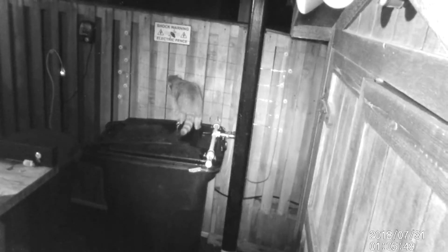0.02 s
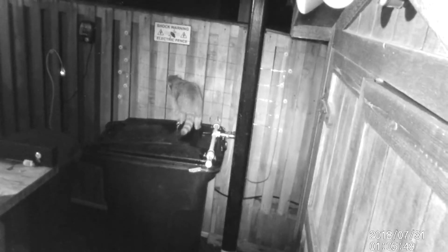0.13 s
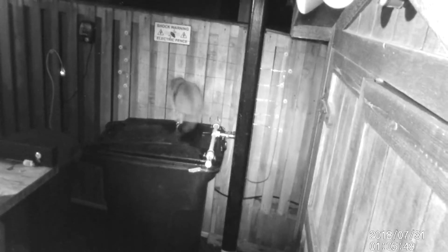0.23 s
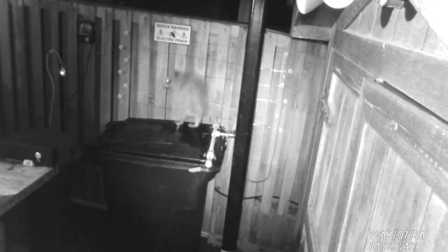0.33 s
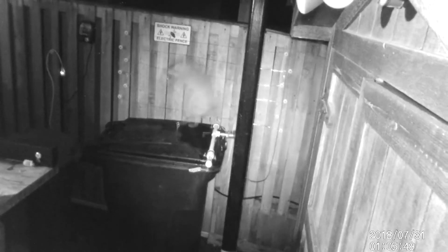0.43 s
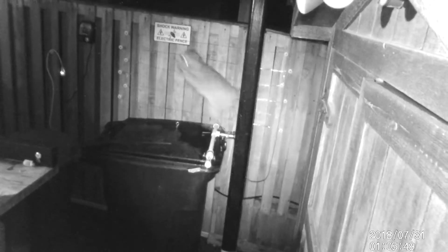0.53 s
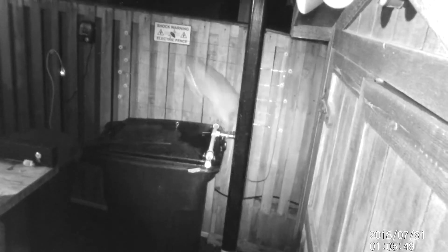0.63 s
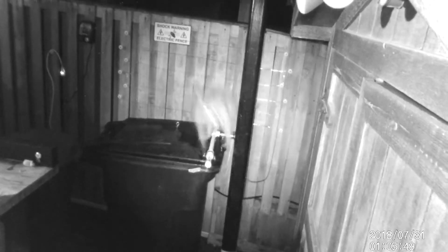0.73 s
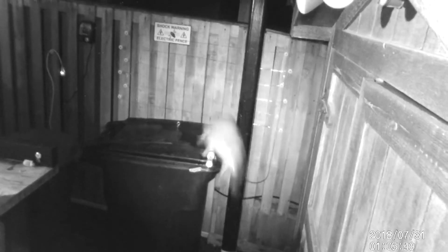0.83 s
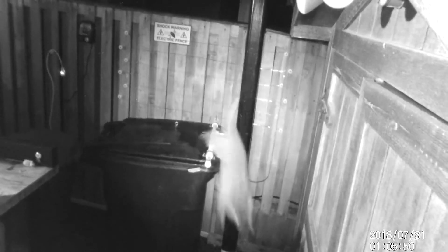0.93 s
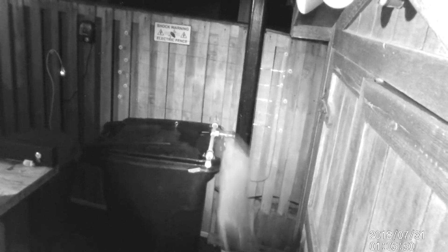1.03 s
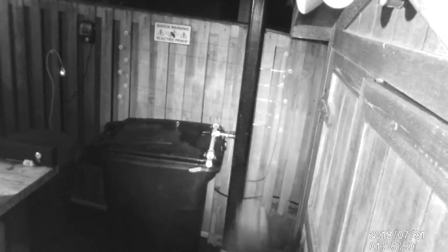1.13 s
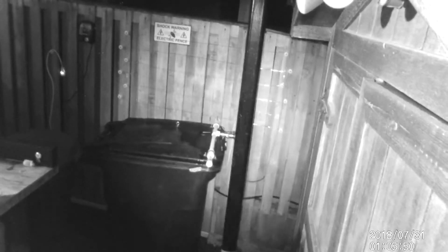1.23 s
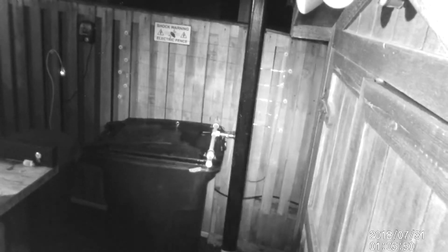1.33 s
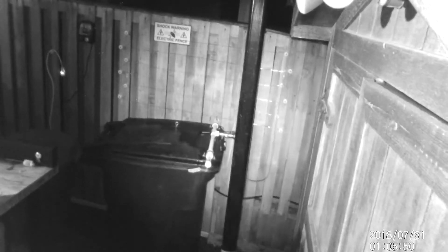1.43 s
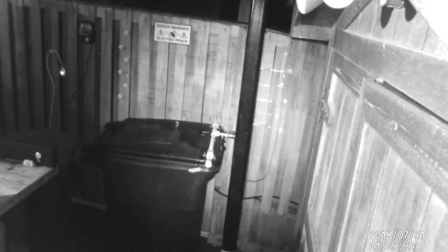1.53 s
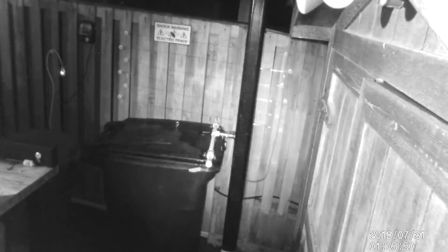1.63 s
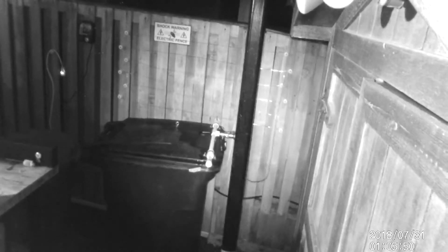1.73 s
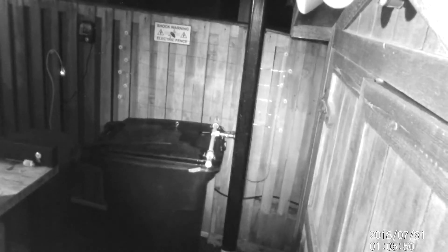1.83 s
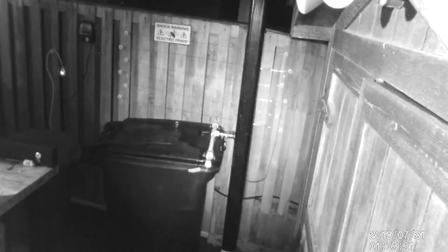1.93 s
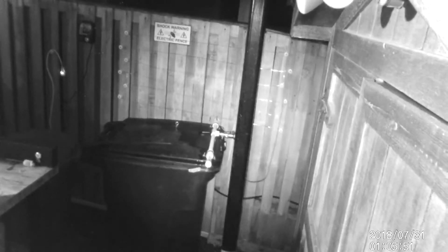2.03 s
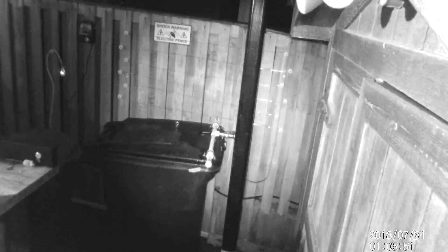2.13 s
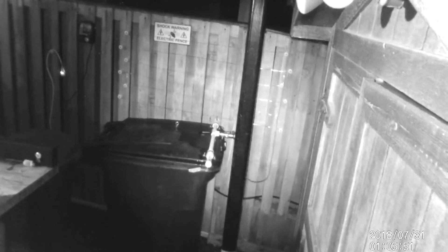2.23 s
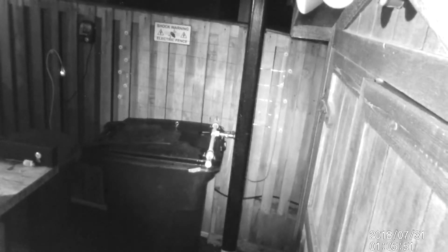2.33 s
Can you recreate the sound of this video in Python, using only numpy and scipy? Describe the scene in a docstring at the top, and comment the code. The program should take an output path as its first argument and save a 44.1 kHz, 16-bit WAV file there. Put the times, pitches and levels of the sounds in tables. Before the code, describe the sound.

An animal scrambles over a hollow bin lid, claws scratching, then crashes down and scurries off

```python
"""Night in a wooden shed: steady hiss and far insects throughout, heard on a camera microphone with a dull top.
First an animal scrambles across a bin lid: claws scratch in bursts of tiny clicks, paws and body thump. At
about 1.2 s it drops to the floor with a crash that clips, then runs off in ever fainter scratches. Clicks,
knocks and hiss are shaped noise, solid blows and claw ticks are short sine pulses; resonances ring as lid and
boards."""
import sys
import numpy as np
from scipy import signal
from scipy.fft import rfft, irfft
from scipy.io import wavfile
from scipy.ndimage import uniform_filter1d

SR = 44100
rng = np.random.default_rng(int(sys.argv[2]) if len(sys.argv) > 2 else 0)


def to_wav(sig):
    """Store sig (one row per channel, or 1-D mono) as 16-bit WAV at the path in sys.argv[1].

    Samples outside -1..1 are clipped; the rate is SR.
    """
    pcm = np.clip(np.atleast_2d(sig), -1, 1) * 32767
    pcm = np.round(pcm).astype(np.int16)
    wavfile.write(sys.argv[1], SR, pcm.T)  # frames by channels


N = 105840  # 2.4 s


def undb(db):
    """Turn decibels into an amplitude factor."""
    return 10 ** (np.asarray(db) / 20)


def unit(x):
    """Scale to rms 1."""
    return x / np.sqrt(np.mean(x ** 2) + 1e-18)


def band(x, hz, width_hz):
    """Two-pole resonance, gain 1 at the centre."""
    b, a = signal.iirpeak(hz, hz / width_hz, fs=SR)
    return signal.lfilter(b, a, x)


def double_band(x, hz, width_hz):
    """The same resonance twice in a row, for steeper skirts."""
    return band(band(x, hz, width_hz), hz, width_hz)


def grains(per_s, spread_db):
    """Random clicks of either sign, a few much larger than the rest."""
    hit = rng.random(N) < per_s / SR
    sign = rng.choice([-1., 1.], N)
    size = undb(spread_db * rng.exponential(size=N))
    return unit(hit * sign * size)


def envelope(start, hold, t60):
    """Quick rise, full level until hold seconds after the start, then exponential fall."""
    attack_s = 0.00033
    t = np.arange(N) / SR - start
    rise = np.clip(t / attack_s, 0, 1)
    return rise * undb(-60 * np.maximum(t - hold, 0) / t60)


# Colour of the steady hiss; its last level below 5 kHz or at it carries on above.
# Each row: frequency in Hz, relative level in dB per Hz.
HISS_COLOUR = [(18, -21), (30, 1.5), (170, -4), (290, -9.5), (528, -7), (588, -9.5), (983, -10.5),
               (5000, -19.5), (6500, -57), (11000, -120)]


def hiss():
    """Steady noise whose spectrum follows the colour table, read along a logarithmic frequency axis."""
    level_db = -46
    f = np.maximum(np.arange(N // 2 + 1) * SR / N, 1)
    hz, db = np.array(HISS_COLOUR).T
    db = np.where(hz > 5000, db[hz <= 5000][-1], db)
    colour = undb(np.interp(np.log(f), np.log(hz), db))
    return undb(level_db) * unit(irfft(rfft(rng.standard_normal(N)) * colour, N))


def insects():
    """Far-off trill: a narrow noise band throbs at a slightly wandering rate."""
    hz, width_hz, level_db = 5450, 650, -49
    throbs_per_s, depth = 60, 0.4
    wander = unit(uniform_filter1d(rng.standard_normal(N), size=4000))
    phase = np.cumsum(1 + 0.0965 * wander) * throbs_per_s / SR
    throb = 1 + depth * np.sin(2 * np.pi * phase)
    return undb(level_db) * throb * unit(double_band(rng.standard_normal(N), hz, width_hz))


def high_hiss():
    """A thin band of noise far above the trill."""
    hz, width_hz, level_db = 9400, 325, -56
    return undb(level_db) * unit(band(rng.standard_normal(N), hz, width_hz))


def shed(x):
    """Short diffuse tail of the plank walls: decaying noise that sets in after 4 ms."""
    t60_s, level_db, hz, width_hz = 0.4, -19.5, 650, 650 / 0.3
    t = np.arange(SR // 2) / SR
    tail = band(rng.standard_normal(len(t)), hz, width_hz) * undb(-60 * t / t60_s) * (t > 0.004)
    return signal.fftconvolve(x, tail / np.linalg.norm(tail))[:N] * undb(level_db)


# Resonances of the lid and boards, struck by paws and body.
# Each row: frequency in Hz, relative level in dB, ring setting in seconds (60 dB down in about half of it).
BODY_MODES = [(209.5, 28, 0.38), (302, -15.5, 0.6), (770, -8, 0.19), (930, 8, 0.047), (1220, -18.5, 0.26),
              (1846, 2, 0.21), (2099, -16, 0.19), (2229, -10, 0.34), (2396, 12, 0.12)]


def lid_and_boards(struck):
    """Whatever strikes them excites a row of resonances, set relative to the strength of the blows."""
    level_db = -13
    ring = sum(undb(db) * band(struck, hz, 4.6 / ring_s) for hz, db, ring_s in BODY_MODES)
    return undb(level_db) * unit(ring) * np.std(struck)


# Scuffles of paws and body on the hollow bin and boards.
# Each row: start in seconds, level in dB, centre in Hz, boom level in dB, hold in seconds,
# time to fall 60 dB in seconds.
SCUFFLES = [(0.078, -45, 256, -45, .05, 0.55), (0.191, -32.5, 299, -47, 0.066, 0.61),
            (0.243, -31.5, 420, -36.5, 0.041, 0.69), (0.332, -24, 450, -28, 0.035, 0.54),
            (0.365, -20, 252, -39, 0.012, 0.33), (0.441, -21.5, 556, -44, .02, 0.28),
            (0.461, -41.5, 750, -38.5, 0.0091, 1), (0.536, -30.5, 224, -45.5, .03, 0.2),
            (0.599, -28.5, 324, -35.5, 0.029, 0.49), (0.632, -35, 255, -32, 0.013, 0.9),
            (0.709, -23.5, 445, -40, 0.018, 0.75), (0.797, -23, 280, -23.5, 0.005, 0.29),
            (0.815, -18, 225, -35.5, 0.037, 0.12), (0.88, -23, 324, -51, 0.0099, 0.36),
            (0.898, -28.5, 463, -32, 0.0067, 0.21), (0.931, -33.5, 245, -29.5, 0.019, 0.19),
            (1.156, -19, 455, -39, 0.0081, 0.1), (1.18, -27.5, 480, -37, 0.0095, 0.14),
            (1.212, -24, 456, -61, 0.0037, 0.085), (1.2355, -13, 511, -52, .015, 0.16),
            (1.24, -19, 198, -56, 0.025, 0.18), (1.261, -25.5, 683, -36, 0.0066, 0.12),
            (1.366, -40.5, 234, -37.5, 0.0067, 0.61), (1.468, -45, 595, -44.5, 0.022, 0.88),
            (1.70, -54, 295, -53, 0.046, 0.44)]


def scuffles():
    """Clusters of soft knocks, each in its own noise band; also returns the push that drives the boom."""
    q, boom_t60_s = 0.84, 0.41
    knocks = grains(2500, spread_db=1.8)
    dull, push = np.zeros(N), np.zeros(N)
    for start, db, hz, boom_db, hold, t60 in SCUFFLES:
        dull += undb(db) * envelope(start, hold, t60) * unit(double_band(knocks, hz, hz / q))
        push += undb(boom_db) * envelope(start, hold, boom_t60_s)
    return dull, push


def bin_boom(push):
    """The hollow bin booms as low noise that swells with each push."""
    hz, width_hz = 67, 45
    low = band(band(rng.standard_normal(N), hz, width_hz), hz, 2 * width_hz)
    return push * unit(low)


# Single short pulses: solid blows, the strongest around the crash on the floor, and a few sharp claw ticks. #
# Each row: start in seconds, level in dB, pulse frequency in Hz.
SHORT_PULSES = [(.357, -9, 520), (.371, -20, 300), (.389, -15, 350), (.7232, -2.5, 2300), (0.833, -25, 214),
                (1.158, -0.5, 428), (1.2373, -10.5, 480), (1.243, 3, 384), (1.1725, -13, 325),
                (1.2332, -0.5, 780), (.441, -17, 590), (1.2615, -13.5, 706), (1.403, -15, 926),
                (1.578, -29, 680)]


def blows():
    """Each blow or tick is a single push: a little over one sine cycle under a smooth window."""
    cycles = 1.37
    out = np.zeros(N)
    for start, db, hz in SHORT_PULSES:
        turn = np.clip((np.arange(N) / SR - start) * hz / cycles, 0, 1)
        window = np.sin(np.pi * turn) ** 2
        out += undb(db) * window * np.sin(2 * np.pi * cycles * (turn - 0.5))
    return out


def thumps():
    """Scuffles and blows both ring the lid and boards; the scuffles also make the bin boom."""
    dull, push = scuffles()
    dull = dull + blows()
    return dull + lid_and_boards(dull) + bin_boom(push)


# Claw scratches across the lid and away over the floor.
# Each row: start in seconds, level in dB, centre in Hz, hold in seconds, time to fall 60 dB in seconds.
CLAW_SCRATCHES = [(0.082, -45.5, 2460, 0.028, 0.34), (.161, -32, 2820, 0.0086, 0.17),
                  (0.205, -27.5, 3530, 0.021, 0.18), (0.259, -25.5, 2070, 0.031, 0.58),
                  (.282, -14, 3880, 0.0054, 0.014), (0.289, -24.5, 3780, 0.012, 0.47),
                  (0.336, -26, 2400, 0.02, 0.18), (.449, -27, 4860, 0.0033, 0.13),
                  (0.476, -34, 3820, 0.0093, 0.3), (0.595, -25.5, 3550, 0.01, 0.13),
                  (0.636, -27, 4600, 0.0035, 0.13), (0.649, -32.5, 2430, 0.028, 0.36),
                  (0.711, -24.5, 3240, 0.015, 0.65), (0.769, -31, 2315, 0.053, 0.13),
                  (0.844, -29, 1850, 0.004, 0.8), (0.882, -36.5, 2400, 0.057, 0.085),
                  (1.133, -29.5, 4200, 0.014, 0.9), (1.1942, -20, 4100, 0.00096, .025),
                  (1.2, -38, 4000, 0.006, 0.23), (1.216, -26, 1880, 0.0053, 0.05),
                  (1.233, -15, 2310, 0.01, 0.18), (1.268, -32, 3180, 0.0059, 0.43),
                  (1.333, -32.5, 4860, 0.0016, 0.064), (1.379, -34, 4800, 0.0094, 0.23),
                  (1.403, -30, 1160, 0.0021, 0.073), (1.484, -45, 2900, 0.0083, 0.39),
                  (1.538, -43.5, 4700, 0.015, 0.22), (1.575, -42, 1230, 0.0036, 0.045),
                  (1.656, -51, 4500, 0.018, 0.47), (1.687, -43, 3420, .003, 0.065),
                  (1.736, -41.5, 4200, 0.046, 0.26), (1.793, -48, 2960, 0.012, 0.35),
                  (1.821, -47, 4300, 0.015, 0.2), (1.909, -52, 4560, 0.027, 0.15),
                  (1.898, -41, 2860, 0.00098, 0.038), (2.037, -49.5, 4120, 0.0074, 0.25),
                  (2.063, -39.5, 2640, 0.0035, 0.25)]


def claws():
    """Each scratch bites, then drags as a burst of clicks with a colour of its own; the claws catch unevenly."""
    q, broad_db = 1.11, -6
    bite_db, bite_t60_s = -7, 0.017
    catch_s, catch_db = 0.004, 2.5
    catch = unit(uniform_filter1d(rng.standard_normal(N), size=int(catch_s * SR)))
    clicks = unit(grains(9000, spread_db=2.2) * undb(catch_db * catch))
    broad = unit(band(clicks, 2850, 7100)) * undb(broad_db)
    out = np.zeros(N)
    for start, db, hz, hold, t60 in CLAW_SCRATCHES:
        bite = undb(bite_db) * envelope(start, 0, bite_t60_s)
        shape = envelope(start, hold, t60) + bite
        coloured = unit(double_band(clicks, hz, hz / q))
        out += undb(db) * shape * (broad + coloured)
    return out


def scene():
    """The animal and its shed tail over the steady night sounds, in mono."""
    background = hiss() + insects() + high_hiss()
    animal = thumps() + claws()
    return (background + shed(animal) + animal)[None]


def record(dry):
    """The microphone drops steeply above its band but leaks a trace of treble; peaks clip, the top is cut."""
    mic_hz, leak_db, leak_hz, leak_width_hz = 5623, -30, 8800, 3500
    clip, offset, top_hz = 0.7, 0.0047, 15800  # the offset is a constant shift of the waveform
    dulled = signal.sosfilt(signal.cheby2(7, 60, mic_hz * 1.467, fs=SR, output="sos"), dry)
    leak = undb(leak_db) * double_band(dry, leak_hz, leak_width_hz)
    clipped = np.clip(dulled + leak, -clip, clip) + offset
    return signal.sosfilt(signal.ellip(8, 0.2, 70, top_hz, fs=SR, output="sos"), clipped)


dry = scene()
out = record(dry)
to_wav(out)
```